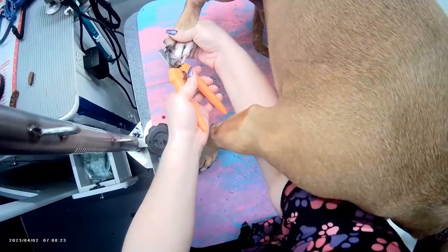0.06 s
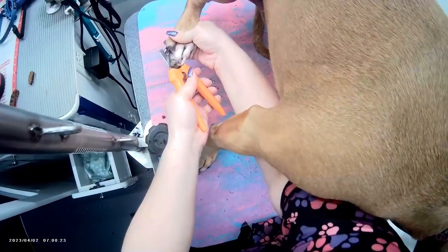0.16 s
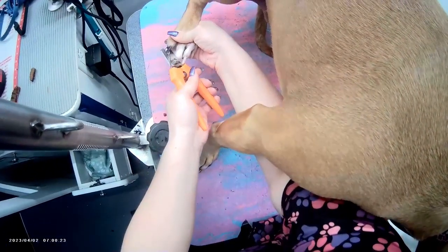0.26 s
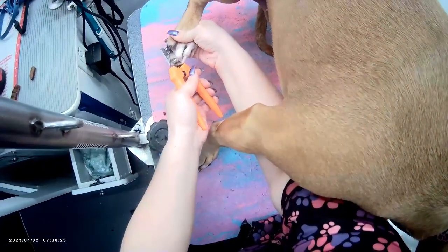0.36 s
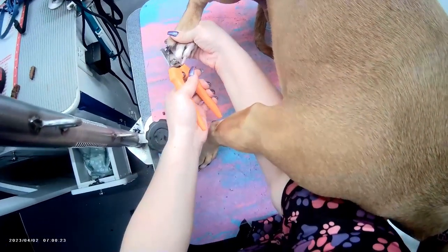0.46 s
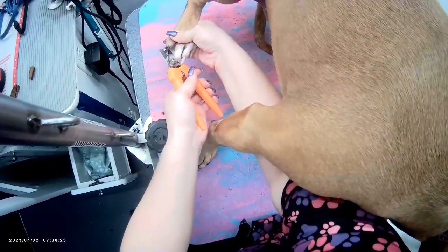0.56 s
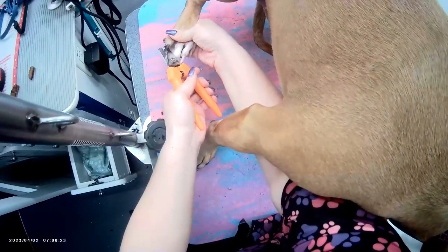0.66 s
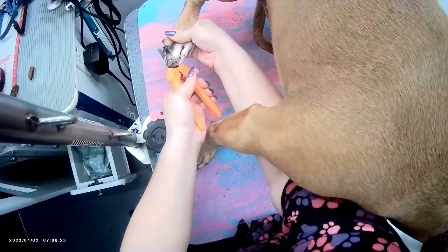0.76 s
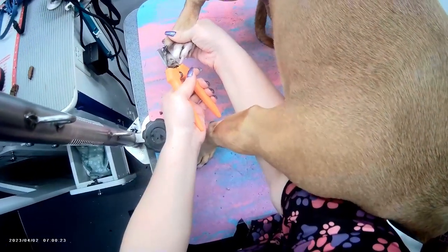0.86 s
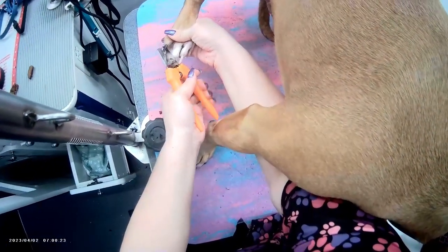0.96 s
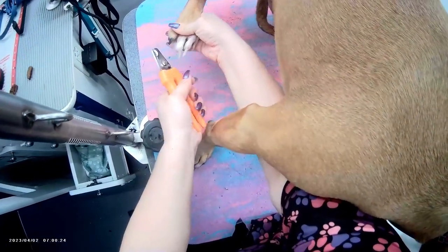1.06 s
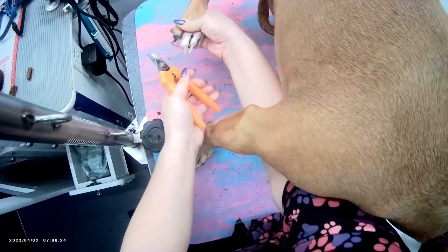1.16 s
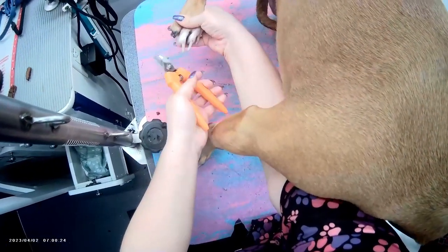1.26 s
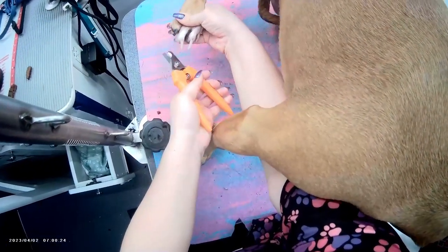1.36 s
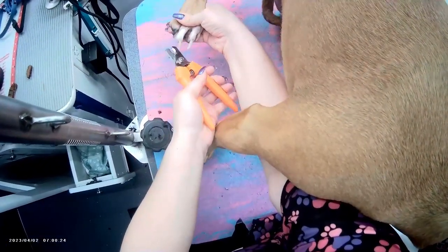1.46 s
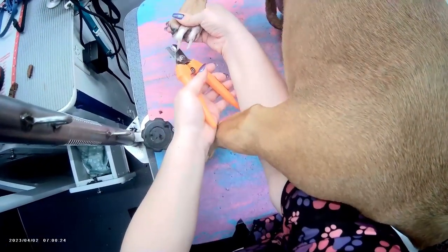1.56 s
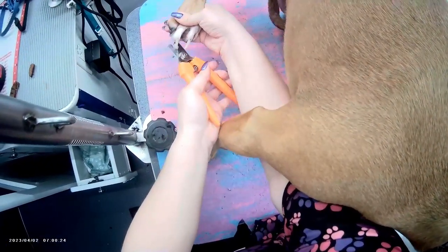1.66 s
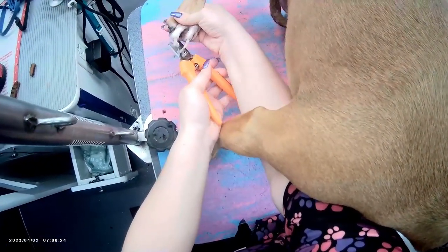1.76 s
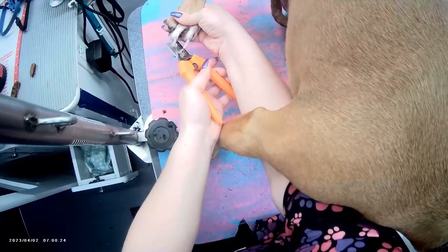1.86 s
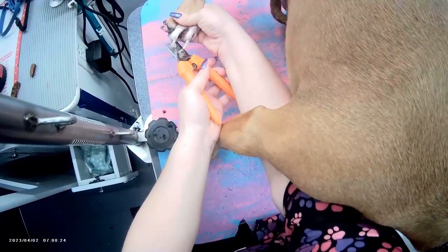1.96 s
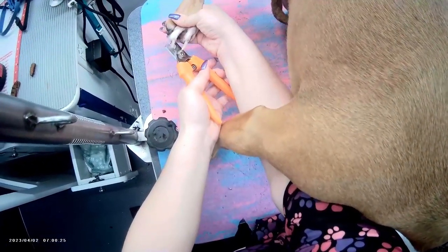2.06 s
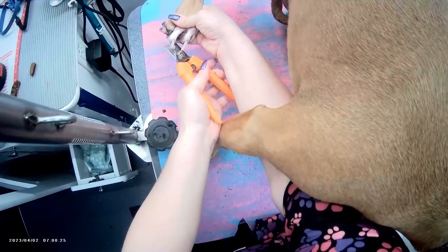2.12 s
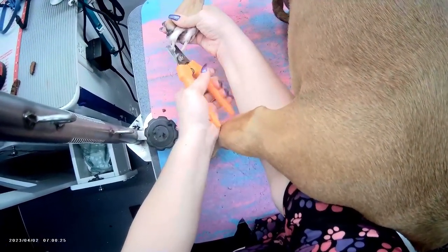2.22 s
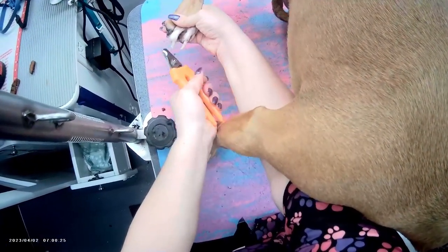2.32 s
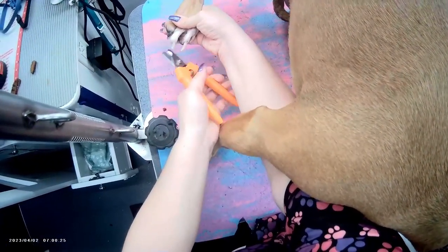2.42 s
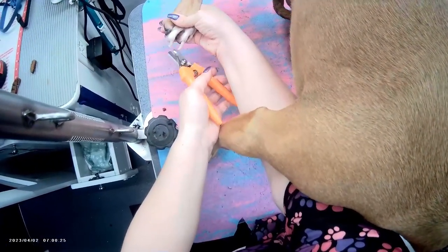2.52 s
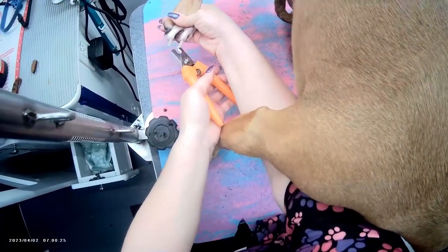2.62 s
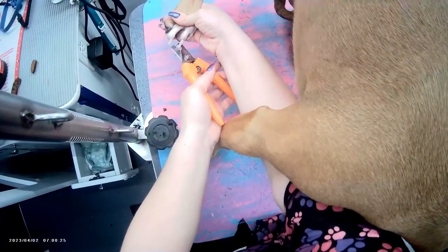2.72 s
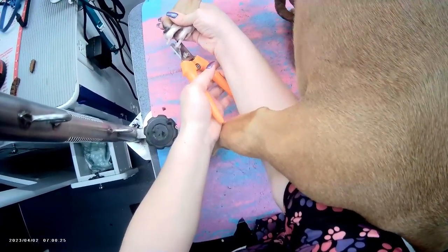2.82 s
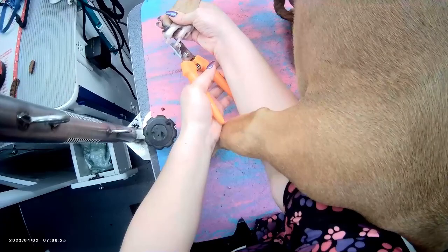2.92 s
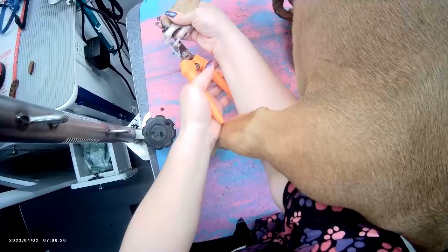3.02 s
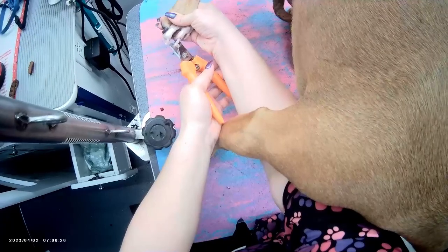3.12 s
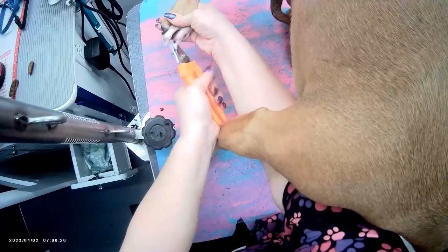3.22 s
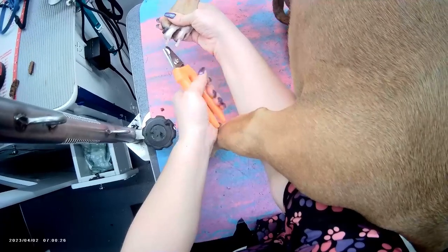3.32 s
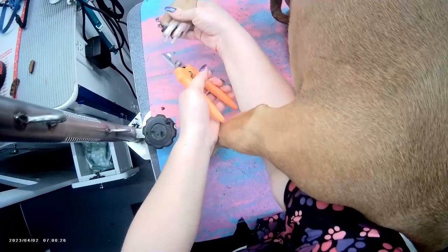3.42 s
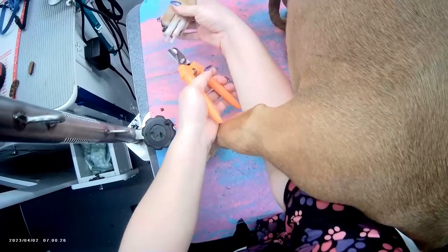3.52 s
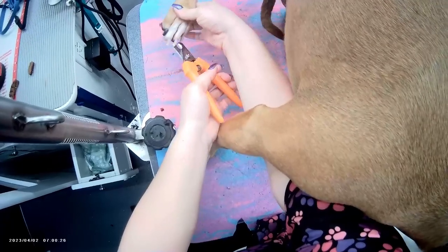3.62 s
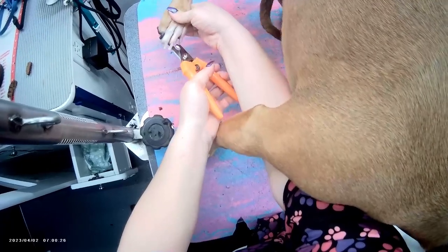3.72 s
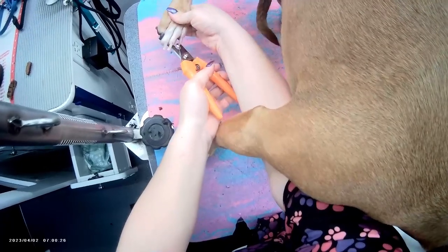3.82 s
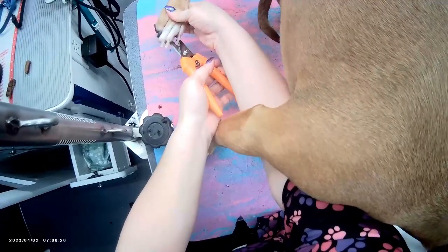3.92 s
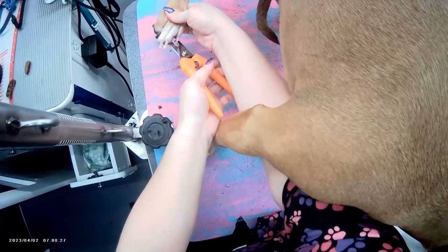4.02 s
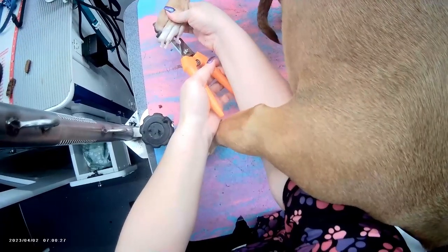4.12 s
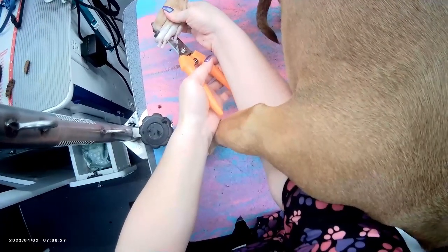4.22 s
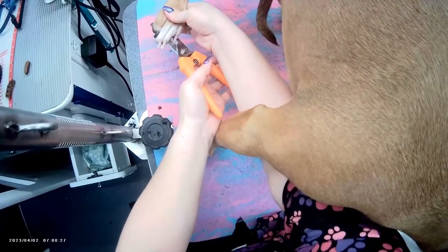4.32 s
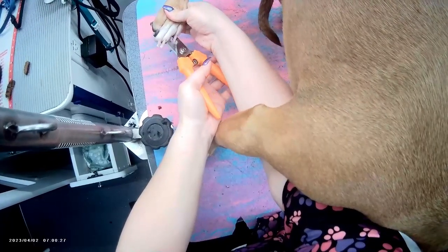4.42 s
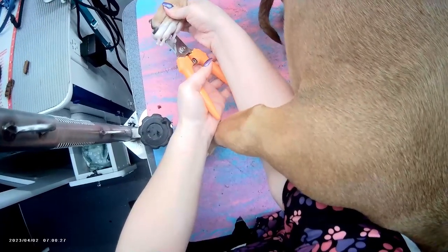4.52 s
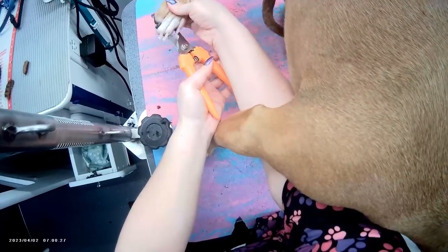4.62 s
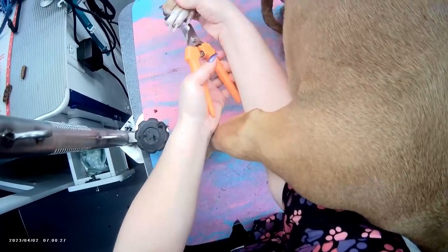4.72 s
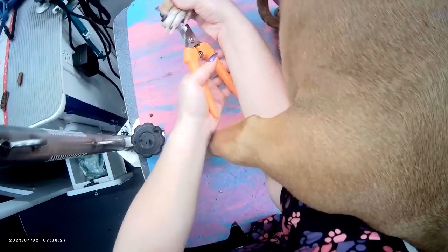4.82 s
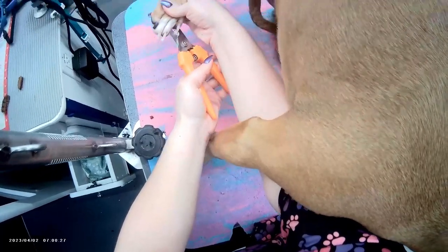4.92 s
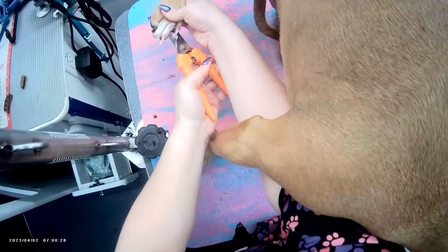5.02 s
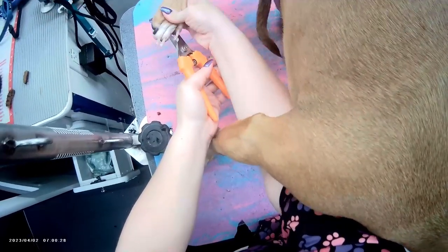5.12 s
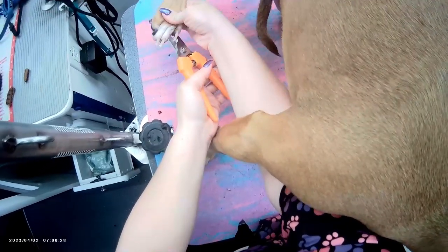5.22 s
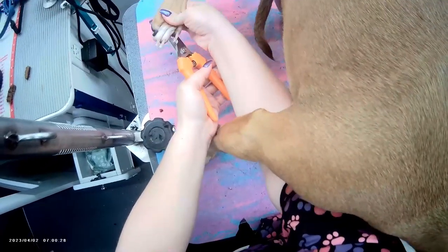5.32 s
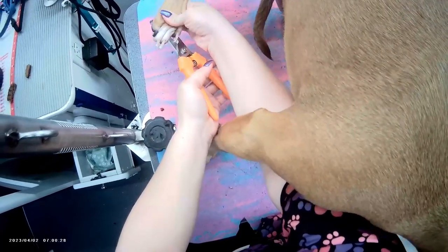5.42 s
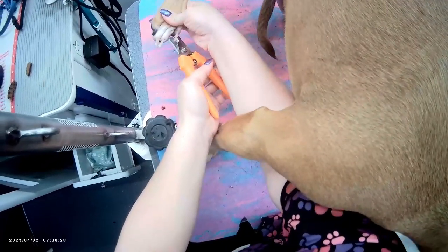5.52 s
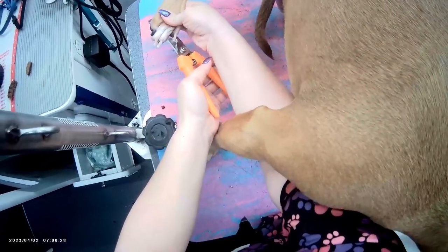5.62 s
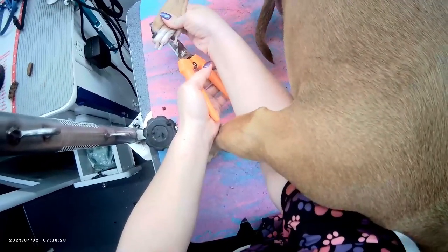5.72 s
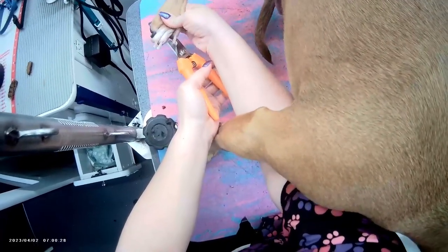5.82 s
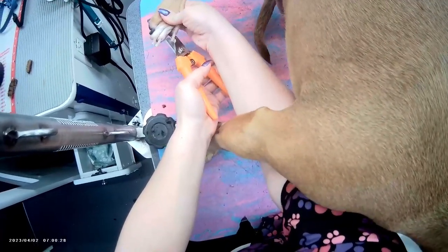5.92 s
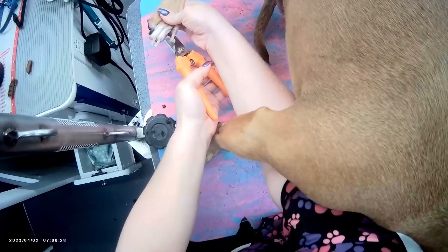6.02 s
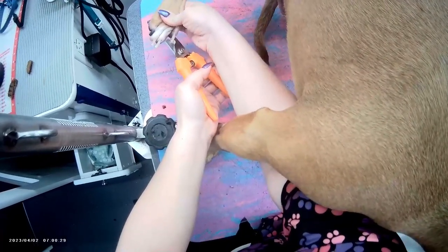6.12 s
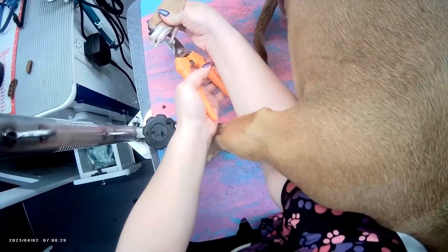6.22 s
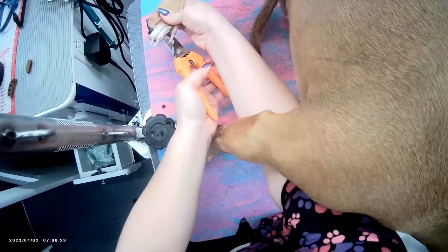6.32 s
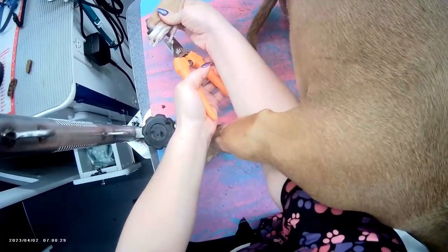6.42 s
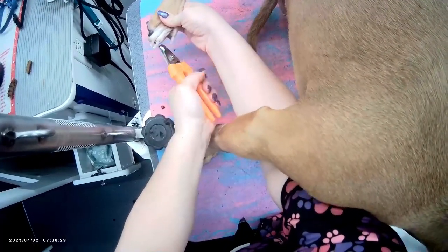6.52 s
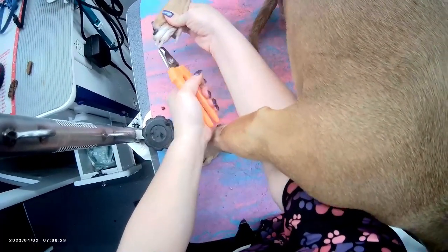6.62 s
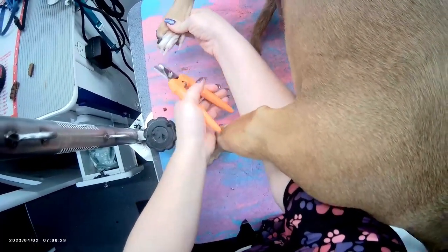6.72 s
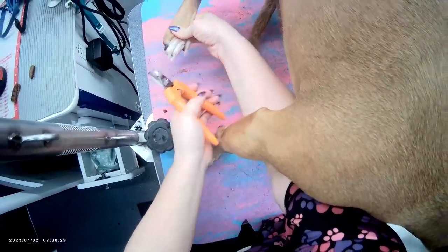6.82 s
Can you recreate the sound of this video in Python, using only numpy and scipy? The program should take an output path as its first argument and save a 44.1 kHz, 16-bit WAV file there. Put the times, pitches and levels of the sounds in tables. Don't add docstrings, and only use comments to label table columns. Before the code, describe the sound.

A small, hard-walled grooming room is filled throughout by a low, wavering hum of fan motors, slowly beating, under a dark, steady rush of air. At 0.7 s the clipper blades give a faint tick, and at 1.0 s a nail breaks with a loud, dry, lower-pitched snap, blades and handles knocking shut within milliseconds. A cluster of metallic ticks begins at 2.2 s, ending in a brighter, softer snap at 2.3 s. More ticks from 3.2 s lead into the loudest crack at about 3.3 s, with a tiny tick at 3.5 s and another at 4.1 s. Then only fans remain while a panel's deep hum swells. Ticks at 6.5 s precede the last hard snap near 6.6 s. Each cut overloads the close microphone slightly and leaves a short, bright room tail before the hum runs on to the end at about 6.9 s.

```python
import sys
import numpy as np
from scipy import signal
from scipy.fft import rfft, irfft
from scipy.io import wavfile

SR = 44100
rng = np.random.default_rng(int(sys.argv[2]) if len(sys.argv) > 2 else 0)


def amp(db):
    return 10 ** (np.asarray(db, float) / 20)


def write(x):
    x = np.atleast_2d(x).T
    wavfile.write(sys.argv[1], SR, np.round(np.clip(x, -1, 1) * 32767).astype(np.int16))


N = 302646

# frequency in Hz, level in dB per Hz.
AIR_SPECTRUM = [(5, 0), (60, -2.5), (140, -2.5), (400, -8), (520, -15), (1300, -23), (1700, -26),
                (2900, -35.5), (3800, -34), (5500, -41), (7200, -45.5), (8000, -56), (8800, -71),
                (9500, -105)]
# centre in Hz, width in Hz, gain in dB.
STANDING_WAVES = [(125, 16.6, 7.5), (179.7, 9.2, 9.5), (202.3, 14.8, -21.5), (265, 16.5, 7),
                  (296.9, 17, 7.5), (308.5, 4.7, -11.5), (389.8, 23, 4.5), (648.5, 33, 4.5), (958, 19, 5.5),
                  (1111, 8.2, 7.5), (1220, 40, 8), (1356, 18, 8), (1554, 13, -20.5), (2090, 110, 2.5)]
AIR_DB = -25.5

# speed in turns per s, start angle in turns.
ROTORS = [(24.2, .79), (24.93, .25), (58.302, .19), (120.33, .34)]
# multiple of its speed, level in dB.
ROTOR_ORDERS = [
    [(1, -32), (2, -28), (3, -40), (4, -42), (5, -46), (6, -39), (8, -41), (9, -47)],
    [(1, -21), (2, -50), (3, -42), (6, -42), (9, -51)],
    [(1, -31), (2, -34)],
    [(1, -33), (2, -46)],
]
# time in seconds, level in dB.
PANEL_SWELL = [(0, -43.5), (1.5, -36), (2.5, -36), (4, -36), (5, -30.5), (6, -26), (6.86, -27)]
PANEL_HZ = 92.473

# frequency in Hz, level in dB per Hz.
WALL_SPECTRUM = [(400, -16.5), (1000, -5), (1500, -7.5), (2000, -4), (2900, -4), (3450, -1.5), (4200, 2),
                 (5000, -1.5), (5800, -1), (6600, 2), (7500, -2), (8300, -2)]
ROOM_T60_S, ROOM_BUILD_S, ROOM_DB = 0.18, 0.0017, -31.5

# frequency in Hz, level in dB, T60 in seconds.
BLADE_MODES = [(1928, -8, 0.02), (2543, -10.5, 0.017), (3633, -11, 0.046), (3696, -7.5, 0.067),
               (4650, -12.5, 0.016), (4810, -9.5, 0.018), (5500, -2.5, 0.013), (6360, -6.5, 0.024)]
RING_T60_S, SPLINTER_T60_S = 0.010, 0.013

# start in seconds, peak in dB, ringing in Hz.
SLIPS = [(.7295, -37, 5500), (1.0283, -28, 2190), (2.2327, -29, 4900), (2.2582, -25, 3800),
         (2.2588, -26, 5600), (2.2927, -21, 4800), (3.2205, -36, 6000), (3.2258, -26, 4880),
         (3.2388, -26, 3820), (3.2513, -21.5, 3700), (3.2520, -28, 6800), (3.2635, -27, 3920),
         (3.2730, -26, 5660), (3.5370, -36, 4040), (4.1325, -34, 4000), (6.5186, -27, 4800),
         (6.5562, -10, 5000)]
REBOUND_S, REBOUND_DB = 0.0062, -8
EDGE_TONE_HZ, EDGE_TONE_DB = 5800, -9.5

SNAP_TIMES_S = [
    1.0295,
    2.2938,
    3.2759,
    6.5590,
]
# snap in dB, snap in Hz, blades closing in dB, closing in Hz.
CUT_TONES = [
    (-1, 2290, -6.5, 4400),
    (-4.5, 5180, -4.5, 4800),
    (0, 3420, 0, 3460),
    (-2, 3600, -5, 3540),
]
SNAP_KNOCK_DB, CLOSE_KNOCK_DB = -19.5, -29
THUD_HZ, THUD_DB = 2430, -12
SHARD_S, SHARD_HZ, SHARD_DB = 0.00043, 6000, -9.5
CLOSE_S = 0.0036
CROSS_S, CROSS_HZ, CROSS_DB = 0.0052, 4980, -6
SHUT_S, SHUT_HZ, SHUT_DB, SHUT_KNOCK_DB = 0.0064, 6300, -8, -3.5

MIC_HZ, MIC_OVERLOAD, TREBLE_EDGE_HZ = 7210, 0.8, 9350
CEILING, OFFSET = 0.71, 0.0152
SPRAY_DB, FADE_S = -11, 0.00008


def at_hz(points, hz):
    point_hz, level_db = np.array(points).T
    return np.interp(np.log(hz + 1e-3), np.log(point_hz), level_db)


def coloured_noise(level_db):
    return irfft(rfft(rng.standard_normal(N)) * amp(level_db), N)


def drift(rate_hz, step=40):
    pole = np.exp(-2 * np.pi * rate_hz * step / SR)
    noise = rng.standard_normal(N // step + 2002)
    slow = signal.lfilter([1], [1, -2 * pole, pole ** 2], noise)[2000:]
    return np.interp(np.arange(N) / step, np.arange(len(slow)), slow / slow.std())


def ring(t, hz, t60_s):
    return np.sin(2 * np.pi * hz * t) * amp(-60 * t / t60_s)


def add(out, start_s, sound):
    i = round(start_s * SR)
    out[i:i + len(sound)] += sound


def air(flicker_db=0.5):
    hz = np.arange(N // 2 + 1) * SR / N
    shape_db = at_hz(AIR_SPECTRUM, hz)
    for centre_hz, width_hz, gain_db in STANDING_WAVES:
        shape_db = shape_db + gain_db / (1 + (2 * (hz - centre_hz) / width_hz) ** 2)
    comb_db = np.interp(hz, np.arange(1000) * 18, rng.normal(0, 2.6, 1000))
    rush = coloured_noise(shape_db + comb_db * (hz > 1600))
    return amp(AIR_DB + flicker_db * drift(5.9)) * rush / rush.std()


def motors():
    t = np.arange(N) / SR
    hum = amp(np.interp(t, *np.transpose(PANEL_SWELL))) * np.sin(2 * np.pi * PANEL_HZ * t)
    for (turns_per_s, start_turns), orders in zip(ROTORS, ROTOR_ORDERS):
        turns = turns_per_s * t + start_turns - 1 / 4
        for multiple, level_db in orders:
            hum += amp(level_db) * np.cos(2 * np.pi * round(multiple) * turns)
    return np.sqrt(2) * hum


def room(crunch, tones, tones_db=-5):
    t = np.arange(16384) / SR
    build = 1 - np.exp(-(t / ROOM_BUILD_S) ** 2)
    decay = build * amp(-60 * t / ROOM_T60_S)
    stored = signal.fftconvolve(crunch ** 2 + tones ** 2, decay ** 2)[:N]
    wash = coloured_noise(at_hz(WALL_SPECTRUM, np.arange(N // 2 + 1) * SR / N))
    echoes = signal.fftconvolve(tones, rng.standard_normal(len(t)) * decay)[:N]
    return amp(ROOM_DB) * (wash * np.sqrt(np.abs(stored)) + amp(tones_db) * echoes)


def handle_knock(t):
    return amp(-3) * ring(t, 450, 0.006) + ring(t, 690, 0.0059) + amp(-4) * ring(t, 1000, 0.0098)


def contacts(rows, ring_db, splinter_db, steel_db):
    tones, crunch = np.zeros(N), np.zeros(N)
    t = np.arange(2048) / SR
    knock = handle_knock(t)
    for start_s, peak_db, hz, knock_db in rows:
        sound = amp(ring_db) * ring(t, hz, RING_T60_S) + amp(knock_db) * knock
        for mode_hz, mode_db, t60_s in BLADE_MODES:
            strike_db = rng.normal(0, 0.56)
            sound += amp(mode_db + steel_db + strike_db) * ring(t, mode_hz, t60_s)
        add(tones, start_s, -amp(peak_db) * sound)
        splinter = rng.standard_normal(len(t)) * amp(-60 * t / SPLINTER_T60_S)
        add(crunch, start_s, amp(peak_db + splinter_db) * splinter)
    high_pass = signal.butter(2, 1750, "high", fs=SR, output="sos")
    return tones, signal.sosfilt(high_pass, crunch)


def slip_contacts(knock_db=-30):
    rows = []
    for s, db, hz in SLIPS:
        rows += [
            (s, db, hz, knock_db),
            (s, db + EDGE_TONE_DB, EDGE_TONE_HZ, knock_db),
            (s + REBOUND_S, db + REBOUND_DB, hz, knock_db),
            (s + 2 * REBOUND_S, db + 2 * REBOUND_DB, hz, knock_db)]
    return rows


def cut_contacts():
    rows = []
    for s, (snap_db, snap_hz, close_db, close_hz) in zip(SNAP_TIMES_S, CUT_TONES):
        rows += [
            (s, snap_db, snap_hz, SNAP_KNOCK_DB),
            (s + SHARD_S, snap_db + THUD_DB, THUD_HZ, SNAP_KNOCK_DB),
            (s + SHARD_S, snap_db + SHARD_DB, SHARD_HZ, SNAP_KNOCK_DB),
            (s + CLOSE_S, close_db, close_hz, CLOSE_KNOCK_DB),
            (s + CROSS_S, close_db + CROSS_DB, CROSS_HZ, CLOSE_KNOCK_DB),
            (s + SHUT_S, SHUT_DB, SHUT_HZ, SHUT_KNOCK_DB)]
    return rows


def clippers():
    cut_tones, cut_crunch = contacts(cut_contacts(), ring_db=-5, splinter_db=-1.5, steel_db=-10.5)
    slip_tones, slip_crunch = contacts(slip_contacts(), ring_db=-4, splinter_db=-10, steel_db=-20)
    tones = cut_tones + slip_tones
    crunch = cut_crunch + slip_crunch
    return tones + crunch + room(crunch, tones)


def scene():
    cuts = MIC_OVERLOAD * np.tanh(clippers() / MIC_OVERLOAD)
    cuts = signal.sosfilt(signal.butter(8, MIC_HZ, fs=SR, output="sos"), cuts)
    cuts = signal.sosfilt(signal.cheby2(12, 50, TREBLE_EDGE_HZ, fs=SR, output="sos"), cuts)
    return (air() + motors() + cuts)[None]


def top_cut(x):
    return signal.sosfilt(signal.butter(12, 15700, fs=SR, output="sos"), x)


def record(dry):
    clipped = np.clip(dry + OFFSET, -CEILING, CEILING)
    body = signal.sosfiltfilt(signal.butter(8, TREBLE_EDGE_HZ, fs=SR, output="sos"), clipped)
    spray = amp(SPRAY_DB) * (clipped - body)
    to_end_s = np.minimum(np.arange(N), np.arange(N)[::-1]) / SR
    fade = 1 - np.exp(-to_end_s / FADE_S)
    return top_cut(fade * (body + spray))


dry = scene()
out = record(dry)
write(out)
```